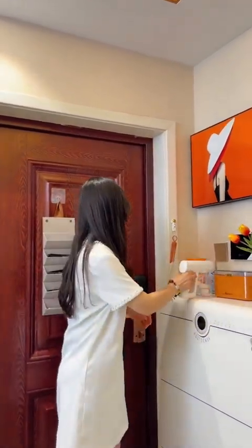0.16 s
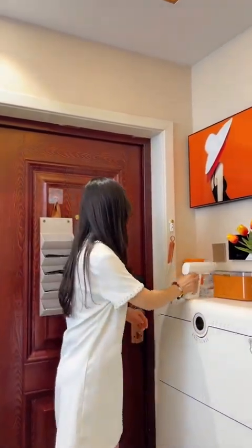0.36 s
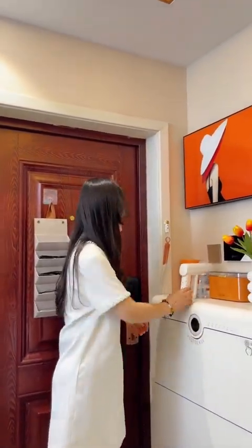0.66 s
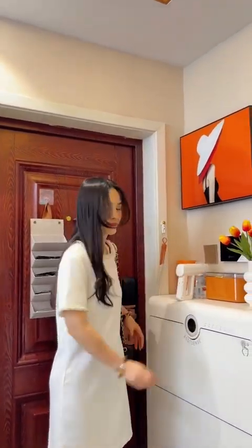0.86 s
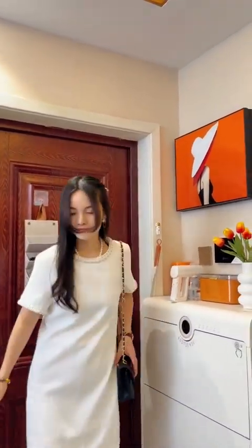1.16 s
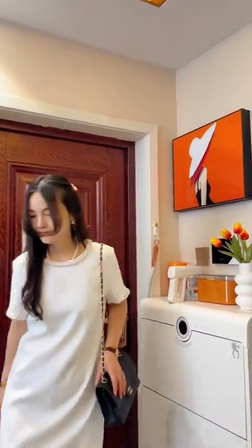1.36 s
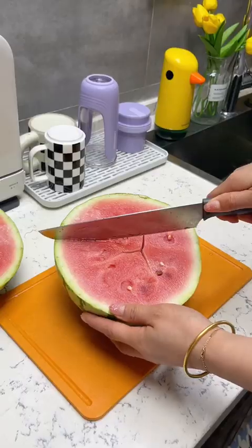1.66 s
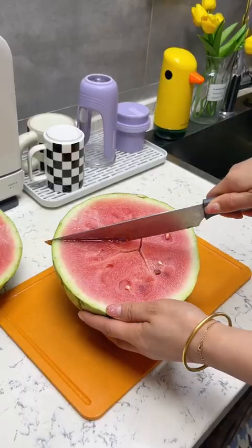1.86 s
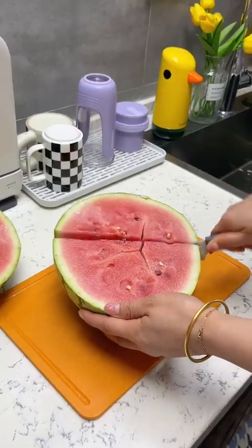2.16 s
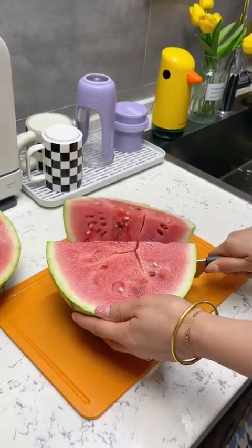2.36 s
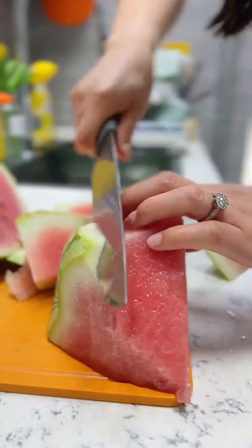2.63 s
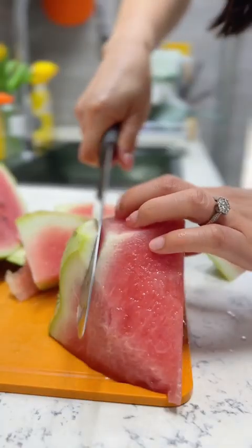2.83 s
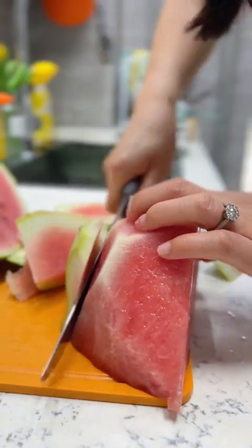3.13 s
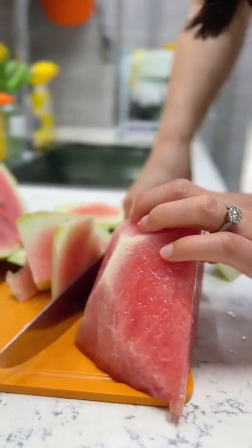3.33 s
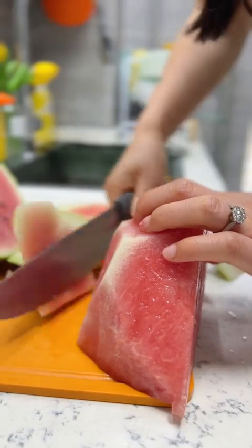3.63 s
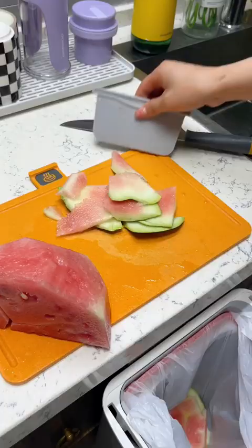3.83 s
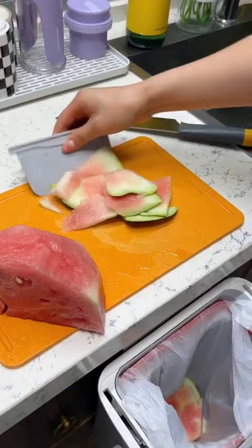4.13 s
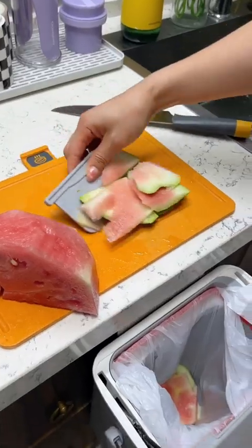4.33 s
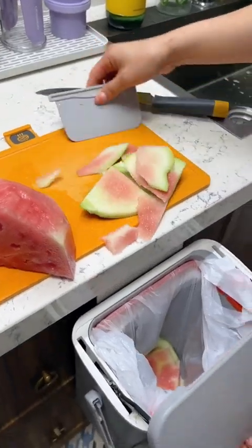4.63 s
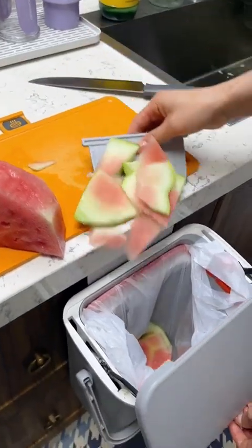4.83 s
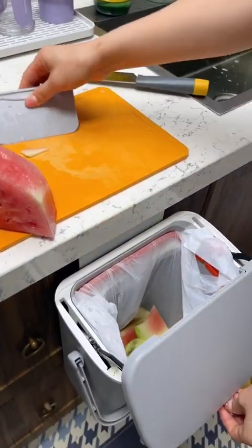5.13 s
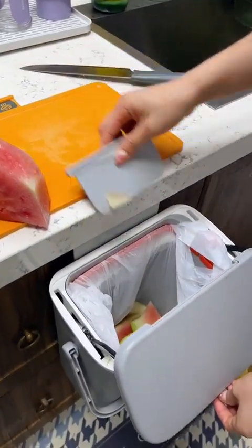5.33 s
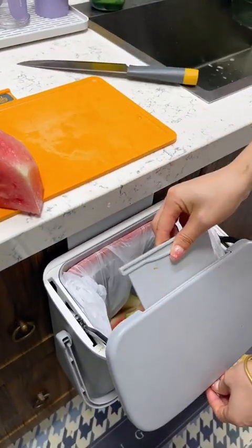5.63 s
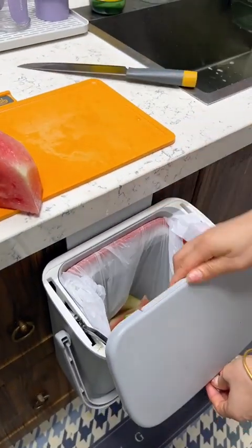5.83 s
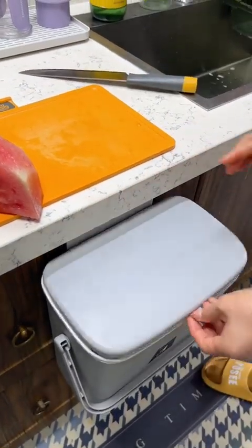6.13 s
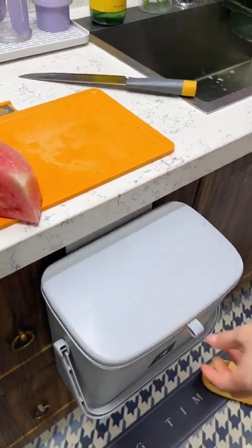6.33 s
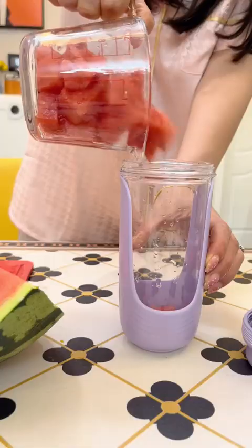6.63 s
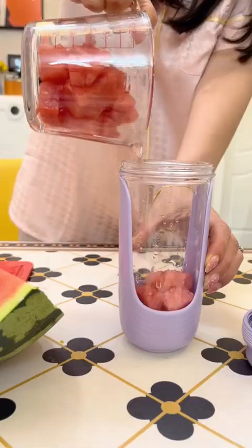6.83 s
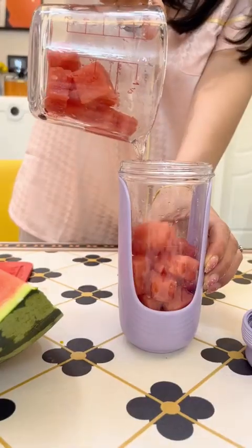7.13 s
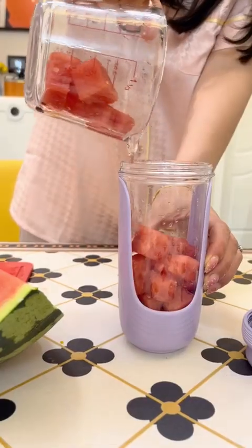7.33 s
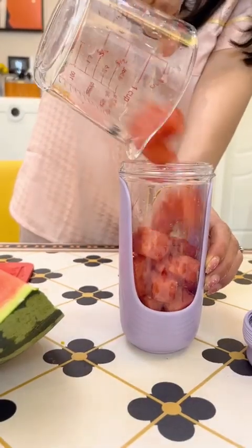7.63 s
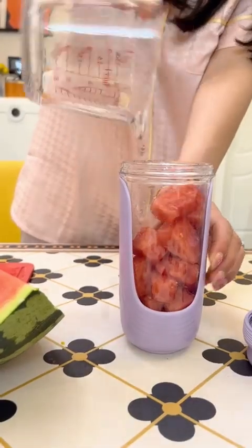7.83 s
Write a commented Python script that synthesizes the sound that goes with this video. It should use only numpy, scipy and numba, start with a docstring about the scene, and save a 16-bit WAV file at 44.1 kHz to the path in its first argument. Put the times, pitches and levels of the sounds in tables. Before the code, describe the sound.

Clothes rustle at once and a heavy wooden door slams near 0.2 s, booming and rattling until 0.5, leaving a low hum; faint bag or latch ticks follow around 1.1. At 1.5 a blade slides lightly onto watermelon, crunches from 1.8, and hits a plastic board near 2.2 and 2.35. From 2.5, over a louder room rumble, crisp wet paring strokes rasp and snap, with board knocks at 3.16 and 3.9. A scraper gathers rinds, squeaks briefly at 4.1, and shoves them from 4.65. They thump into a rustling liner at 5.0; another scrape comes at 5.3. The scraper knocks and wipes the plastic rim at 5.75-5.9, and the lid rubs and claps shut near 6.15. After a tiny dropout, a steady fan hum with fluttering whine begins at 6.63. Wet cubes plop at 6.7-6.8, 7.1 and 7.7; glass taps the cup at 7.9. Close microphone, short indoor reflections.

```python
"""A knife crunches through a watermelon and pares off its rind on a plastic board, after a heavy door has shut.
A scraper pushes the rinds into a lined bin, whose lid falls shut; then melon cubes plop from a glass jug
into a blender cup over a steady fan-like hum. Cutting and rubbing are dense trains of uneven clicks that ring
resonances; blows are short noise cracks with decaying modes and a room tail; the background is coloured noise."""
import sys
import numpy as np
from scipy import signal
from scipy.fft import rfft, irfft, next_fast_len
from scipy.io import wavfile
from scipy.ndimage import uniform_filter1d, map_coordinates
from numba import njit

SR = 44100
rng = np.random.default_rng(int(sys.argv[2]) if len(sys.argv) > 2 else 0)


def materialize(psi):
    """Save the field psi as 16-bit PCM at rate SR to the path in sys.argv[1].

    A 1-D psi becomes a single channel; in a 2-D psi each row is a channel.
    """
    bounded = np.clip(np.atleast_2d(psi).T, -1, 1)
    quanta = np.round(bounded * 32767).astype(np.int16)
    wavfile.write(sys.argv[1], SR, quanta)


N = 352359
TIME = np.arange(N) / SR


def undb(db):
    """Decibels to gain."""
    return 10 ** (np.asarray(db) / 20)


def unit(x):
    """Scale to rms 1."""
    return x / np.sqrt(np.mean(x ** 2) + 1e-18)


def shape(x, response):
    """Filter by a function of frequency."""
    size = next_fast_len(x.shape[-1] + SR // 10)
    hz = np.maximum(np.fft.rfftfreq(size, 1 / SR), 1)
    return irfft(rfft(x, size) * response(hz), size)[..., :x.shape[-1]]


def tint(x, colour):
    """Colour a sound by points in Hz and dB, joined along log frequency."""
    points, db = np.transpose(colour)
    return shape(x, lambda hz: undb(np.interp(np.log(hz), np.log(points), db)))


# Stereo width. Each row: frequency in Hz, gain of the side signal in dB.
STEREO_WIDTH = [(60, -18.5), (150, -9), (300, -8), (600, -1), (1200, -2), (2200, 0.5), (4000, 2),
                (8000, -0.5), (15000, 1.5)]


def stereo(pair):
    """Two unrelated signals become left and right: alike in the bass, diffuse in the treble."""
    side = tint(pair[1], STEREO_WIDTH)
    return np.array([pair[0] + side, pair[0] - side])


# Body, middle and treble. Each row: lower edge in Hz, upper edge in Hz.
REGISTER_BANDS = [(20, 500), (500, 3000), (3000, 16000)]


def registers(x):
    """Split into body, middle and treble."""
    filters = [signal.butter(N=3, Wn=band, btype="band", fs=SR, output="sos") for band in REGISTER_BANDS]
    return [signal.sosfilt(sos, x) for sos in filters]


def add(out, s, x):
    """Mix x in at time s."""
    start = max(int(s * SR), 0)
    out[:, start:start + x.shape[-1]] += x[:, :N - start]


def lean(db):
    """Left and right gains for a level difference, left minus right."""
    return undb(np.array([[db], [-db]]) / 2)


@njit
def sweep(x, hz, q):
    """Band-pass with a moving centre: a state-variable filter retuned at each sample."""
    y, band, low = np.empty(len(x)), 0., 0.
    for i in range(len(x)):
        g = np.tan(np.pi * hz[i] / SR)
        v = (band + g * (x[i] - low)) / (1 + g * (g + 1 / q))
        band, low, y[i] = 2 * v - band, low + 2 * g * v, v / q
    return y


def swell(t, s, rise_s, hold_s, release_s):
    """Gain of one stroke: it climbs 20 dB in rise_s to full force at s, holds, and loses 20 dB every release_s."""
    early = np.maximum(s - t, 0)
    late = np.maximum(t - s - hold_s, 0)
    return undb(-20 * (early / rise_s + late / release_s))


def tone(hz, s, rise_s, hold_s, db, release_s=0.12):
    """A sine that swells, holds and dies away."""
    sine = unit(np.sin(2 * np.pi * hz * TIME))
    return sine * undb(db) * swell(TIME, s, rise_s, hold_s, release_s)


def wander(x, share, rate_hz=14):
    """Let every pitch drift by about this share of itself, by reading the sound at an uneven pace."""
    t = TIME[:len(x)]
    walk = np.interp(t * rate_hz, np.arange(200), rng.standard_normal(200))
    return map_coordinates(x, [np.cumsum(1 + share * walk)], order=3, mode="mirror")


def reflect(x, echo_db):
    """Direct sound plus worktop and tile reflections, as mid and side; the pattern changes as the edge moves on."""
    t, hop = TIME[:SR // 25], SR // 25
    crossfade = np.sqrt(np.hanning(2 * hop))
    out = np.zeros((2, N))
    for start in range(0, len(x) - 2 * hop, hop):
        paths = rng.standard_normal((2, len(t))) * np.exp(-t / .012)  # fades with a 12 ms time constant
        paths *= undb(echo_db) / np.linalg.norm(paths, axis=1, keepdims=True)
        paths[0, 0] += 1  # direct sound, in the mid only
        paths /= np.linalg.norm(paths, axis=1, keepdims=True)
        piece = x[None, start:start + 2 * hop] * crossfade
        add(out, start / SR, signal.fftconvolve(piece, paths, axes=1))
    return out[:, :len(x)]


def rub(strokes, colour, resonances, ring_db, grain_db, left_db, slip_db, echo_db, release_s, drift=.03,
        glide=None, glide_db=0, glide_q=1):
    """Bursting cells and tiny slips: dense uneven clicks ring the thing rubbed, and any gliding resonances."""
    t = TIME[max(int((strokes[0][0] - .15) * SR), 0):int((strokes[-1][0] + .45) * SR)]
    # the edge catches and lets go about a hundred times a second
    slips = np.interp(t, np.arange(900) / 100, rng.standard_normal(900))
    grains = np.minimum(rng.exponential(size=len(t)), 6)
    sizes = undb(grain_db * grains + slip_db * slips)
    # a click falls on one sample in five
    clicks = rng.standard_normal(len(t)) * sizes * (rng.random(len(t)) < .2)

    def response(hz):
        # a resonance's table level counts by half
        return 1 + sum(undb(ring_db + db / 2) / (1 + 2j * (hz - f) / width) for f, width, db in resonances)

    ringing = wander(shape(clicks, response), drift)
    if glide is not None:
        times, *centres = np.transpose(glide)
        for k, (hz, db) in enumerate(zip(centres, glide_db)):
            gliding = sweep(clicks, np.interp(t, times, hz), 1. * glide_q)
            ringing = ringing + (-1) ** k * undb(db) * gliding
    pair = reflect(ringing, echo_db)
    bands = registers(stereo(tint(pair, colour)))
    body, middle, hiss = (x / np.std(x.mean(axis=0)) for x in bands)
    # body and hiss die away a little faster than the middle
    releases = release_s * np.array([[0.9], [1], [0.87]])
    # overlapping strokes add in power
    power = sum((undb(levels)[:, None] * swell(t, s, rise, hold, releases)) ** 2
                for s, rise, hold, *levels in strokes)
    level, body_level, hiss_level = np.sqrt(power)
    out = np.zeros((2, N))
    add(out, t[0], middle * level * lean(left_db) + body * body_level + hiss * hiss_level)
    return out


def strike(blows, modes, colour, ring_db, crack_s, room_db, room_t60, push_s, boom=1.54):
    """Contact builds up, then a short crack and the object's modes ring; boom stretches the bass of the room."""
    t = np.arange(-SR // 40, int(1.1 * SR)) / SR
    age = np.maximum(t, 0)
    contact = 1 / (1 + np.exp(np.clip(-t / push_s, -50, 50)))
    tail_onset = 1 - np.exp(-age / 0.00076)
    room_t60s = (room_t60 * boom, room_t60, room_t60 * 1.1)
    out = np.zeros((2, N))
    for s, db, body_db, click_db, *left_db in blows:
        crack, diffuse = (unit(stereo(tint(rng.standard_normal((2, len(t))), colour))) for _ in range(2))
        detune = 1 + .008 * rng.standard_normal(len(modes))  # each blow rings slightly off pitch
        ring = sum((-1) ** k * undb(gain) * np.sin(2 * np.pi * hz * detune[k] * t) * undb(-60 * age / t60)
                   for k, (hz, gain, t60) in enumerate(modes))
        direct = registers((crack * np.exp(-age / crack_s) + undb(ring_db) * ring) * contact)
        peaks_db = (body_db, db, click_db)
        for near, far, peak_db, t60 in zip(direct, registers(diffuse), peaks_db, room_t60s):
            # loudest 5 ms of the direct sound
            peak = np.sqrt(uniform_filter1d(near.mean(axis=0) ** 2, SR // 200).max())
            tail = unit(far) * tail_onset * np.exp(-np.log(1000) * age / t60)
            add(out, s + t[0], undb(peak_db) * lean(sum(left_db)) * (near / peak + undb(room_db) * tail))
    return out


def air(colour):
    """Steady background noise whose level wavers by about half a decibel."""
    knots = np.linspace(0, TIME[-1], num=60)
    waver = np.interp(TIME, knots, rng.standard_normal(len(knots)))
    return unit(stereo(tint(rng.standard_normal((2, N)), colour))) * undb(.5 * waver)


# Colours of room rumble and fan rush. Each row: frequency in Hz, gain in dB.
ROOM_COLOUR = [(15, -36.5), (25, -4), (118, -5), (186, -7.5), (318, -21), (604, -26), (927, -25.5),
               (2370, -32.5), (4150, -33.5), (12400, -43), (15000, -46.5)]
FAN_COLOUR = [(15, -38), (25, -9), (65, -5), (121, -4.5), (250, -8.5), (373, -5), (445, -15.5), (530, -11),
              (870, -15.5), (980, -21.5), (1250, -25), (1520, -30.5), (1720, -42), (9270, -56),
              (10000, -54), (13500, -70), (15000, -48)]
# Steps of the rumble's level. Each row: start in seconds, level in dB.
ROOM_LEVEL = [(0, -56.5), (1.5, -54), (2.45, -44.5), (6.62, -57.5)]
# Narrow noise tones of the fan. Each row: frequency in Hz, level in dB.
FAN_TONES = [(129, -45.5), (183, -56.5), (307, -55.5), (517, -55), (748, -56.5)]
# Spells of the fan's whine. Each row: full force in seconds, rise and hold in seconds, level in dB.
FAN_WHINE = [(6.666, 0.01, 0.47, -44), (7.56, 0.079, 0.48, -41)]


def background():
    """Low room rumble in level steps, then a fan's rush with narrow noise tones and a fluttering whine."""
    starts, step_db = np.transpose(ROOM_LEVEL)
    step = np.searchsorted(starts[1:], TIME)
    rumble = air(ROOM_COLOUR) * uniform_filter1d(undb(step_db)[step], size=SR // 20)
    fan = undb(-40) * air(FAN_COLOUR) * lean(2.8)
    for hz, db in FAN_TONES:
        hum = shape(rng.standard_normal(N), lambda f: 1 / (1 + ((f - hz) / 5) ** 2))
        fan = fan + undb(db) * unit(hum)
    fan_on = np.clip((TIME - 6.632) / 0.0009, 0, 1)
    # the whine's level takes a new random value 16 times a second
    flutter_db = 4 * np.interp(TIME, np.arange(130) / 16, rng.standard_normal(130))
    whine = wander(sum(tone(371.5, *spell) for spell in FAN_WHINE), share=0.0127)
    return rumble + fan * fan_on + whine * undb(flutter_db)


# Strokes of rustling clothes and of the door's rattle. Each row: full force in seconds,
# rise and hold in seconds, middle, body and hiss levels in dB.
RUSTLES = [(.02, 0.48, 0.19, -54, -81, -45.5), (.42, 0.26, 0.092, -41, -42, -42.5),
           (.88, 0.25, 0.11, -62.5, -50.5, -54), (1.07, 0.083, 0.021, -49, -48, -47),
           (1.4, 0.86, 0.07, -58, -53.5, -63)]
# Blows of the door, then ticks of latch or key and taps of a handbag.
# Each row: contact in seconds, middle, body and click peaks in dB.
DOOR_BLOWS = [(.229, -8, -2.5, -17.5), (.262, -28, -4.5, -57), (.320, -12.5, -3.5, -30),
              (.385, -20, -8.5, -44), (.447, -25, -32, -60), (.478, -30.5, -28.5, -58),
              (.502, -36, -18, -37.5), (.535, -49, -33, -54)]
LIGHT_TAPS = [(.111, -75, -68, -41), (.494, -49, -29.5, -36.5), (1.036, -44, -38.5, -52),
              (1.055, -36, -34, -41.5), (1.091, -57, -58, -48), (1.212, -71, -66, -49.5),
              (1.425, -51, -64, -52.5)]
# Modes of the door. Each row: nominal frequency in Hz, level in dB, 60 dB decay in seconds.
DOOR_MODES = [(54.7, -5.5, 0.94), (81.1, 1.5, 0.84), (111, -3.5, 0.96), (135.8, 3.5, 0.46), (171, -7, 0.7),
              (209.8, 4, 0.37), (242.7, -2.5, 0.23), (278, -0.5, 0.29), (350, -9.5, 0.3),
              (397.5, -12, 0.29), (468, -3.5, 0.27), (580, -9, 0.16), (650, -6.5, 0.1), (870, -14.5, .14),
              (1035, -4, 0.025), (1530, -20, 0.15), (1620, -36, 0.79)]
# Colours of the rustle, the door's contact and the light taps. Each row: frequency in Hz, gain in dB.
RUSTLE_COLOUR = [(100, 17.5), (500, -6.5), (1500, 0), (3000, -14.5), (5000, -18), (9000, -25),
                 (13000, -23.5), (15500, -35)]
DOOR_COLOUR = [(18, -47), (30, -17), (69, 7), (168, -12), (208, -0.5), (389, -12), (467, -8), (787, -16.5),
               (1770, -31), (5040, -52), (10200, -54), (12300, -53), (15500, -63.5)]
TAP_COLOUR = [(100, -8.5), (350, -17), (1200, 8), (5000, -12), (9000, -6.5), (13000, -10), (15500, -22)]


def door():
    """Clothes rustle and the door rattles, hits its frame, rebounds and booms; latch and handbag tick and tap."""
    rustle = rub(RUSTLES, RUSTLE_COLOUR, [], ring_db=0, grain_db=-4.0, left_db=3.5, slip_db=2.0,
                 echo_db=9.5, release_s=0.15)
    slam = strike(DOOR_BLOWS, DOOR_MODES, DOOR_COLOUR, ring_db=-12.5, crack_s=0.0045,
                  room_db=-8.0, room_t60=0.53, push_s=0.0031, boom=1.0)
    tap_modes = [(740, 4.5, 0.023), (1500, -12, .04)]  # Hz, dB, decay in seconds
    taps = strike(LIGHT_TAPS, tap_modes, TAP_COLOUR, ring_db=-8.5, crack_s=0.0076,
                  room_db=-2, room_t60=0.25, push_s=0.00056)
    # a low hum lingers after the door
    drone = wander(tone(58.3, .4, rise_s=0.054, hold_s=.63, db=-39), share=0.028)
    return rustle + slam + taps + drone


# Strokes of sliding cubes and the grazing jug. Each row: full force in seconds, rise and hold in seconds,
# middle, body and hiss levels in dB.
SLIDING = [(6.757, 0.035, 0.009, -39, -24, -40), (7.03, 0.089, 0.03, -58, -55, -51.5),
           (7.095, 0.059, 0.0059, -42, -26.5, -41), (7.57, 0.024, 0.014, -60, -40, -61.5),
           (7.675, 0.021, 0.031, -46, -31.5, -42.5)]
JUG_GRAZE = [(7.897, .012, 0.0092, -41.5, -52, -33.5)]
# Resonances of the cup under sliding cubes. Each row: frequency in Hz, width in Hz, strength in dB.
CUP_RESONANCES = [(560, 21, 7), (1470, 90, -7), (2280, 160, 13), (4760, 450, -8)]
# Plops of the cubes, their knocks on the cup's wall and taps of the glass.
# Each row: contact in seconds, middle, body and click peaks in dB.
MELON_PLOPS = [(6.702, -39, -23.5, -48), (6.76, -49, -10.5, -37.5), (6.797, -33, -26.5, -41),
               (7.089, -50, -29, -37), (7.126, -37, -23, -43), (7.68, -50, -33, -60),
               (7.697, -36, -41, -50), (7.81, -41.5, -34, -66)]
CUP_KNOCKS = [(6.701, -53, -50, -41.5), (6.757, -42, -38, -49), (6.966, -45.5, -47, -45),
              (7.086, -32, -48, -48), (7.098, -31.5, -44, -51), (7.128, -43, -52, -56)]
GLASS_TAPS = [(7.907, -29.5, -46, -28), (7.958, -36.5, -36.5, -32)]
# Modes of plop, cup wall and glass. Each row: nominal frequency in Hz, level in dB, 60 dB decay in seconds.
PLOP_MODES = [(89.5, 11.5, 0.11), (129, 13, 0.18), (207, 0.5, 0.096), (305, -16, 0.048), (564, -4, 0.1)]
CUP_MODES = [(1393, 2, 0.051), (2450, -6, 0.07), (4160, -8, 0.045)]
GLASS_MODES = [(1350, -9, 0.025), (1790, -2, 0.012), (4800, -11, 0.05), (5300, 0, 0.012),
               (5900, -12, 0.049), (7030, -6, 0.023)]
# Colours of wet sliding and of bright snaps and taps. Each row: frequency in Hz, gain in dB.
SLIDE_COLOUR = [(70, -15), (125, 1.5), (190, -4), (300, -11.5), (600, -16.5), (900, -23), (2300, -28.5),
                (3500, -30.5), (6000, -32.5), (14000, -34.5)]
SNAP_COLOUR = [(200, -12.5), (1000, 1), (2200, 0), (6000, -8), (9000, -11.5), (14000, -17)]


def pouring():
    """Wet cubes slide from the jug and plop into the cup, knocking on its wall; the glass grazes and taps the rim."""
    sliding = rub(SLIDING, SLIDE_COLOUR, CUP_RESONANCES, ring_db=8.5, grain_db=3.5, left_db=0.5, slip_db=2.0,
                  echo_db=0.5, release_s=0.1)
    plops = strike(MELON_PLOPS, PLOP_MODES, SLIDE_COLOUR, ring_db=4.5, crack_s=0.012,
                   room_db=-25.5, room_t60=0.18, push_s=0.0014)
    graze = rub(JUG_GRAZE, SNAP_COLOUR, [], ring_db=0, grain_db=1.5, left_db=12, slip_db=-3.5,
                echo_db=-5, release_s=0.046)
    taps = strike(GLASS_TAPS, GLASS_MODES, SNAP_COLOUR, ring_db=-1, crack_s=0.0027,
                  room_db=-17, room_t60=0.4, push_s=.0005)
    knocks = strike(CUP_KNOCKS, CUP_MODES, SNAP_COLOUR, ring_db=-2, crack_s=0.0037,
                    room_db=-19, room_t60=0.3, push_s=0.00047)
    return sliding + plops + knocks + graze + taps


# Strokes of the rustling liner, the wiped scraper and the lid's hinge.
# Each row: full force in seconds, rise and hold in seconds, middle, body and hiss levels in dB.
LINER = [(4.968, 0.038, 0.026, -32.5, -34, -24.5), (5.0, 0.018, 0.065, -23.5, -32.5, -20),
         (5.473, 0.039, 0.0067, -39, -43, -36.5), (5.555, 0.009, 0.0026, -42, -45, -38)]
WIPING = [(5.73, 0.015, 0.034, -32, -28, -34.5), (5.843, 0.024, 0.011, -13.5, -20.5, -26)]
LID_SLIDE = [(6.07, 0.021, 0.028, -24, -23, -29.5), (6.16, 0.04, 0.022, -22.5, -25, -27),
             (6.44, 0.06, 0.036, -59, -47, -72), (6.572, 0.053, .025, -43.5, -40.5, -54.5)]
# Resonances of the bin's rim. Each row: frequency in Hz, width in Hz, strength in dB.
RIM = [(817, 12, 1.5), (1210, 80, -1.5), (1500, 24, 16.5), (1960, 49, -19.5), (2040, 490, -13)]
# Thumps of rinds, knocks on the bin and blows of its lid.
# Each row: contact in seconds, middle, body and click peaks in dB.
RIND_THUMPS = [(4.999, -31, -6.5, -19.5), (5.016, -18, -6, -29.5), (5.085, -38, -5, -29),
               (5.142, -66, -24, -38), (5.482, -50, -17.5, -31.5), (5.968, -34.5, -16.5, -63)]
BIN_KNOCKS = [(5.627, -24.5, -23, -40), (5.685, -28, -25.5, -47), (5.764, -6.5, -8.5, -27.5),
              (5.826, -11, -20, -30), (5.846, -11.5, -28, -25.5), (5.863, -9.5, -31, -24.5),
              (6.068, -12, -19, -19), (6.074, -23, -22, -27)]
LID_BLOWS = [(6.104, -35, -32.5, -29), (6.16, -5.5, -10.5, -15), (6.18, -15, -4.5, -23.5),
             (6.21, -20, -16, -43.5), (6.222, -17, -21, -45), (6.26, -34, -32, -52)]
# Modes of filled liner, bin and lid. Each row: nominal frequency in Hz, level in dB, 60 dB decay in seconds.
BAG_MODES = [(117, -13.5, 0.41), (182.7, -5, 0.34), (245.7, 4.5, 0.088), (309, 7.5, 0.043)]
BIN_MODES = [(249.4, -11, 0.087), (430, -7.5, 0.026), (640, 0, 0.037), (815, 5, 0.037), (1130, -2, 0.041),
             (1450, -13.5, 0.097), (1640, -2.5, 0.033), (2200, -17, 0.033)]
LID_MODES = [(144, -19, 0.37), (217, -16, 0.37), (255, 2, 0.2), (309.5, 12, 0.13), (465, -10.5, 0.31),
             (642, -10, 0.25), (886, -11.5, 0.18), (1740, -14.5, 0.091), (2230, -23, 0.18)]
# Colours of liner, wiping, thump, bin and lid. Each row: frequency in Hz, gain in dB.
LINER_COLOUR = [(260, -24), (450, -3), (709, -7), (937, -4), (2700, -10), (8590, -13.5), (10200, -17),
                (12400, -13.5), (15000, -12.5)]
WIPE_COLOUR = [(59, -61), (100, -32.5), (248, -16.5), (508, -23), (825, -6), (1370, -12.5), (1840, -6),
               (3050, -12.5), (12600, -24), (14500, -31), (15500, -100)]
THUMP_COLOUR = [(25, -20), (60, -18), (110, -19.5), (285, -4.5), (359, -19.5), (705, -23.5), (953, -21),
                (2710, -30), (3930, -34), (10200, -27.5), (12300, -32), (15500, -30.5)]
BIN_COLOUR = [(47, -36), (80, -13.5), (246, -1), (532, -4.5), (845, 6.5), (1300, -4.5), (2430, -13),
              (3100, -15.5), (3870, -17), (8360, -26.5), (9980, -42.5), (13300, -36.5), (15500, -62.5)]
LID_COLOUR = [(25, -27), (70, -23.5), (183, -15), (305, -13), (413, -29), (453, -28.5), (627, -14.5),
              (1260, -26), (2050, -30), (12000, -51), (15500, -59)]


def waste_bin():
    """Rinds thump into the rustling liner, the scraper is wiped on the rim, the lid rubs in its hinge and falls shut."""
    thumps = strike(RIND_THUMPS, BAG_MODES, THUMP_COLOUR, ring_db=-4.0, crack_s=0.018,
                    room_db=-10, room_t60=0.2, push_s=0.003)
    wiping = rub(WIPING, WIPE_COLOUR, RIM, ring_db=6.5, grain_db=1.0, left_db=-1.0, slip_db=2.0,
                 echo_db=-17.0, release_s=0.08)
    knocks = strike(BIN_KNOCKS, BIN_MODES, BIN_COLOUR, ring_db=-0.5, crack_s=0.0055,
                    room_db=-14, room_t60=0.45, push_s=.0005)
    lid = strike(LID_BLOWS, LID_MODES, LID_COLOUR, ring_db=-10.0, crack_s=0.0024,
                 room_db=-8.5, room_t60=0.32, push_s=.0005)
    hinge = rub(LID_SLIDE, LID_COLOUR, [], ring_db=0, grain_db=-1.5, left_db=1.5, slip_db=-4.5,
                echo_db=-1.5, release_s=0.089)
    rustle = rub(LINER, LINER_COLOUR, [], ring_db=0, grain_db=1.5, left_db=2, slip_db=6.0,
                 echo_db=8.5, release_s=0.16)
    return thumps + rustle + wiping + knocks + lid + hinge


# Knocks on the board. Each row: contact in seconds, middle, body and click peaks in dB, left minus right in dB.
BOARD_KNOCKS = [(2.173, -12, -28, -20, 2), (2.183, -19, -45, -12.5, 0), (2.198, -12.5, -25, -22, 0.5),
                (2.336, -11.5, -15, -41, 1.5), (3.161, -15.5, -33, -27, 9), (3.168, -8.5, -34, -14, -2),
                (3.863, -7.5, -8, -18, -1), (3.871, -15, -17.5, -18, 10), (3.886, -11, -16, -30, -9),
                (3.9, -8, -10.5, -18, 0.5), (4.138, -21, -19.5, -42, 3.5), (4.149, -18.5, -26.5, -42, -9),
                (4.651, -15, -19.5, -20, -4), (4.657, -16, -15.5, -19.5, 2)]
# Modes of the struck board. Each row: nominal frequency in Hz, level in dB, 60 dB decay in seconds.
BOARD_MODES = [(65.6, -27, 0.15), (198, -33.5, 0.36), (364, -29.5, 0.027), (805, 3.5, 0.018),
               (1017, 14, 0.0049), (1191, 16.5, 0.015), (2020, 10.5, 0.0075), (3530, -15, 0.038)]
# Strokes of the scraper, gathering and pushing. Each row: full force in seconds, rise and hold in seconds,
# middle, body and hiss levels in dB.
SWEEPING = [(3.91, 0.035, 0.082, -21.5, -24.5, -32.5), (4.05, 0.094, 0.047, -32.5, -39, -39),
            (4.15, 0.01, 0.034, -26, -34, -32), (4.28, 0.32, 0.16, -31.5, -38, -34.5),
            (4.54, 0.21, 0.0019, -60.5, -47.5, -46.5)]
SHOVING = [(4.618, 0.0036, 0.014, -37.5, -29.5, -48.5), (4.651, 0.016, 0.011, -18, -22.5, -18),
           (4.755, 0.083, 0.013, -12.5, -43.5, -18.5), (4.86, 0.14, 0.036, -21.5, -27.5, -29),
           (5.29, 0.21, 0.056, -16.5, -28, -25.5), (5.345, 0.024, 0.01, -16, -20, -20)]
# Resonances of board and scraper when rubbed. Each row: frequency in Hz, width in Hz, strength in dB.
BOARD_RESONANCES = [(319, 14, 29.5), (430, 49, 21.5), (740, 95, 4.5), (1150, 71, 2.5), (2840, 110, -4.5),
                    (3460, 130, -15)]
SCRAPER_RESONANCES = [(1260, 60, -1.5), (1890, 160, 8), (3040, 120, -10)]
# Resonances of the gap between scraper and board. Each row: time in seconds, lower and upper frequency in Hz.
GAP = [(4.65, 1200, 1900), (4.715, 1260, 1930), (4.745, 1500, 2720), (4.775, 1500, 2620),
       (4.82, 1320, 2030), (4.86, 1130, 1660), (4.89, 860, 1310), (4.95, 700, 1110), (5.17, 1130, 1670),
       (5.26, 1260, 1530), (5.315, 1440, 1860), (5.355, 673, 1270), (5.42, 610, 1410)]
# Colours of knock, sweep and shove. Each row: frequency in Hz, gain in dB.
KNOCK_COLOUR = [(59, -49), (100, -13.5), (530, -15.5), (1160, 16.5), (2520, -4), (3540, -5.5), (5870, -24),
                (8060, -15.5), (13400, -33.5), (15500, -49)]
SWEEP_COLOUR = [(59, -47), (100, -16), (313, -8), (355, -13.5), (879, -2.5), (1180, 6.5), (1400, 3),
                (5170, -12), (10200, -17), (12800, -17), (15500, -23.5)]
SHOVE_COLOUR = [(59, -38.5), (100, -17), (129, 2), (270, -4), (313, 1), (362, -1), (800, -1), (1400, -4.5),
                (1900, -3.5), (2400, -6), (2930, -8.5), (10200, -19), (13400, -20.5), (15500, -31.5)]


def board():
    """Knife and scraper knock on the board; the scraper gathers rinds, squeaks once and shoves them over the edge."""
    knocks = strike(BOARD_KNOCKS, BOARD_MODES, KNOCK_COLOUR, ring_db=-14.0, crack_s=0.0011,
                    room_db=-11.5, room_t60=0.28, push_s=0.00099)
    sweeping = rub(SWEEPING, SWEEP_COLOUR, BOARD_RESONANCES, ring_db=-7.0, grain_db=1.0, left_db=0.0, slip_db=1.0,
                   echo_db=1.0, release_s=0.097, drift=0.043)
    shoving = rub(SHOVING, SHOVE_COLOUR, SCRAPER_RESONANCES, ring_db=3.5, grain_db=-0.5, left_db=0, slip_db=0.5,
                  echo_db=5, release_s=0.09, drift=.012, glide=GAP, glide_db=(14, 12), glide_q=4)
    squeak = tone(450, 4.095, rise_s=0.014, hold_s=0.014, db=-29, release_s=0.011)
    return knocks + sweeping + shoving + squeak


# Strokes of the blade sliding on, halving, paring, and of the pared rind sliding away.
# Each row: full force in seconds, rise and hold in seconds, middle, body and hiss levels in dB.
BLADE_TOUCH = [(1.505, 0.0067, 0.0022, -49.5, -52, -52), (1.523, .004, 0.048, -58, -54, -43)]
HALVING = [(1.62, 0.036, 0.33, -74, -59, -54.5), (1.8, 0.032, 0.011, -35, -34, -33),
           (1.96, 0.038, 0.0073, -24.5, -26.5, -25), (2.06, 0.02, 0.11, -41.5, -61, -38.5),
           (2.177, 0.025, 0.003, -12, -18.5, -19.5), (2.22, .02, 0.035, -23.5, -25, -38.5),
           (2.28, .04, .035, -27, -34, -35.5), (2.355, 0.059, 0.0075, -24, -24.5, -28.5)]
PARING = [(2.582, 0.011, 0.0042, -25, -38.5, -26.5), (2.645, 0.05, 0.083, -32.5, -41, -31.5),
          (2.825, 0.13, 0.0015, -34.5, -41.5, -36), (2.885, 0.027, 0.063, -28.5, -40, -28.5),
          (3.055, 0.14, 0.026, -37.5, -50.5, -37.5), (3.12, 0.032, 0.023, -24.5, -43.5, -25),
          (3.162, 0.033, 0.0024, -22, -28, -29.5), (3.2, 0.028, 0.14, -32.5, -42, -43.5),
          (3.525, 0.032, 0.019, -22.5, -34.5, -36)]
RIND_SLIDE = [(3.755, 0.25, 0.019, -43.5, -52, -44)]
# Resonances of blade, melon, rind and wet rind. Each row: frequency in Hz, width in Hz, strength in dB.
BLADE = [(5250, 550, 3), (8000, 870, 15)]
MELON = [(344, 37, 6.5), (440, 44, 10), (2090, 180, -3.5)]
RIND = [(1510, 720, -30), (4300, 640, 11), (4900, 180, 18)]
WET_RIND = [(2200, 370, 17), (3700, 130, -26)]
# Resonances of the cut, which draw together as the rind peels away.
# Each row: time in seconds, lower and upper frequency in Hz.
CUT = [(2.58, 580, 3020), (2.72, 680, 2720), (2.9, 775, 2850), (3.1, 890, 2950), (3.17, 1130, 2650),
       (3.25, 1220, 2450), (3.55, 1290, 2180)]
# Snaps of the rind and rolls of a cut half. Each row: contact in seconds, middle, body and click peaks in dB.
RIND_SNAPS = [(1.948, -24.5, -57, -44.5), (2.165, -25, -46.5, -21.5), (2.549, -53, -50, -33),
              (2.572, -48, -52, -38), (3.24, -43, -54, -29), (3.284, -27, -55, -26),
              (3.304, -26.5, -32.5, -28), (3.308, -40, -48.5, -27), (3.468, -43.5, -61, -37),
              (3.503, -36, -51.5, -27)]
MELON_ROLLS = [(2.484, -43, -24, -52), (2.51, -44, -40, -45)]
# Modes of a snap. Each row: nominal frequency in Hz, level in dB, 60 dB decay in seconds.
SNAP_MODES = [(2110, 10, 0.029), (3500, 13.5, 0.0084), (5830, -21, 0.011)]
# Colours of halving and paring. Each row: frequency in Hz, gain in dB.
HALVING_COLOUR = [(59, -29.5), (100, -24.5), (253, -24.5), (340, -20), (470, -20), (620, -20), (850, -18),
                  (1210, -14.5), (2130, -18.5), (3690, -13.5), (5000, -7), (7890, -9.5), (10200, -9.5),
                  (12800, -8), (15500, -17.5)]
PARING_COLOUR = [(59, -22), (100, -0.5), (287, -7), (758, -6.5), (1310, -6), (1840, -8.5), (2040, -10.5),
                 (3050, -8), (4860, -1), (10400, -2.5), (13400, -3), (15500, -13)]


def knife():
    """The blade slides on and crunches through flesh and snapping rind; a half rolls over, a paring slides off."""
    touch = rub(BLADE_TOUCH, HALVING_COLOUR, BLADE, ring_db=7, grain_db=3.0, left_db=-1, slip_db=-2.5,
                echo_db=7, release_s=0.13, drift=0.008)
    halving = rub(HALVING, HALVING_COLOUR, MELON, ring_db=6.0, grain_db=1.0, left_db=-1.0, slip_db=-0.5,
                  echo_db=2.5, release_s=0.099, drift=.06)
    paring = rub(PARING, PARING_COLOUR, RIND, ring_db=-9.0, grain_db=0.0, left_db=5.0, slip_db=3.0,
                 echo_db=5.0, release_s=0.072, drift=0.06, glide=CUT, glide_db=(8, 7), glide_q=8.2)
    slide = rub(RIND_SLIDE, PARING_COLOUR, WET_RIND, ring_db=10, grain_db=2.5, left_db=5.5, slip_db=3.5,
                echo_db=7, release_s=0.11)
    snaps = strike(RIND_SNAPS, SNAP_MODES, SNAP_COLOUR, ring_db=-18.5, crack_s=.0015,
                   room_db=-7, room_t60=0.26, push_s=0.00012)
    roll_modes = [(54.7, 0.5, 0.15), (104, -5.5, 0.088), (196, -6.5, 0.048)]  # Hz, dB, decay in seconds
    rolls = strike(MELON_ROLLS, roll_modes, THUMP_COLOUR, ring_db=8, crack_s=0.016,
                   room_db=-28.5, room_t60=0.2, push_s=0.0062)
    return touch + halving + paring + slide + snaps + rolls


def scene():
    """All sources together."""
    return background() + door() + pouring() + waste_bin() + board() + knife()


# Colour of the microphone. Each row: frequency in Hz, gain in dB.
MIC_COLOUR = [(20, -3), (9300, -1.5), (9900, -6), (10200, -16.5), (10700, -2), (11600, 0), (13800, 0.5),
              (14700, -6), (15100, -17), (16000, -10.5)]
# Instants when the sound cuts out. Each row: start in seconds, end in seconds.
DROPOUTS = [(1.511, 1.52), (1.536, 1.544), (3.85, 3.859), (3.875, 3.884), (6.598, 6.628), (6.638, 6.65)]


def record(dry):
    """The microphone has a notch in the treble; the sound cuts out at instants, peaks flatten and the top is cut."""
    muted = sum((TIME > start) & (TIME < end) for start, end in DROPOUTS)
    gate = uniform_filter1d(undb(-30. * muted), size=64)  # 30 dB down, with soft edges
    flattened = np.clip(tint(dry, MIC_COLOUR) * gate, -1, 1)
    low_pass = signal.ellip(10, .2, 80, 15850, fs=SR, output="sos")
    return signal.sosfilt(low_pass, flattened)


dry = scene()
out = record(dry)
materialize(out)
```